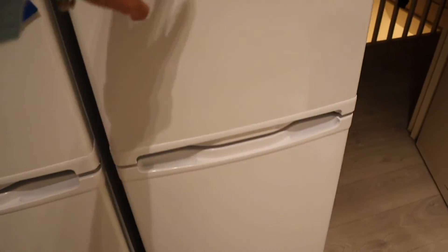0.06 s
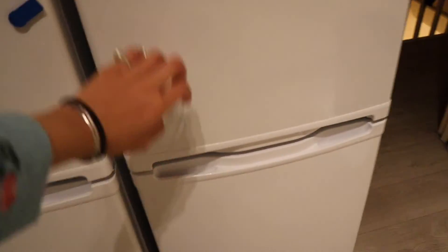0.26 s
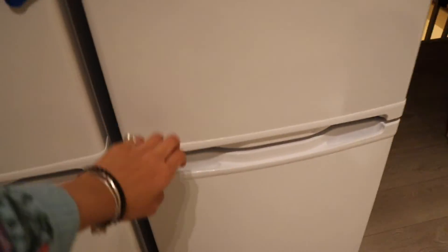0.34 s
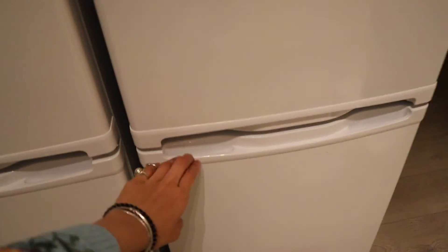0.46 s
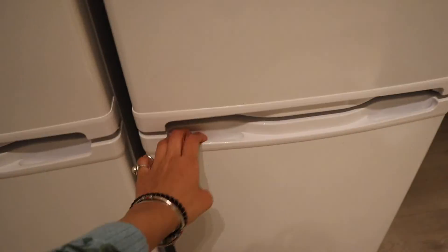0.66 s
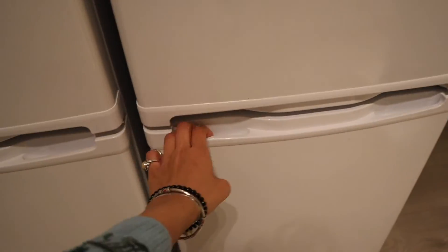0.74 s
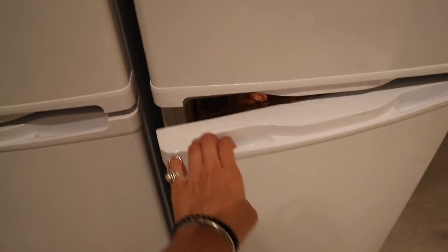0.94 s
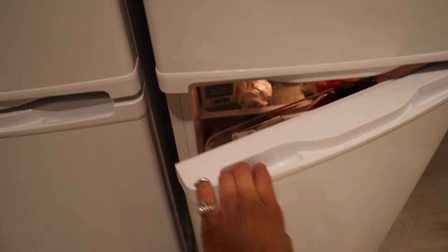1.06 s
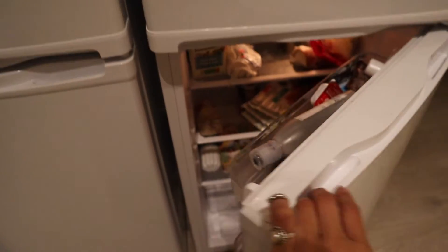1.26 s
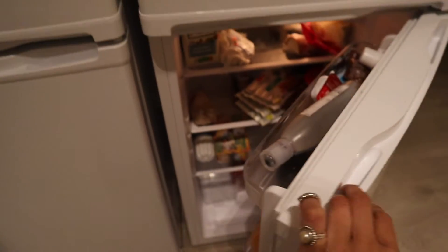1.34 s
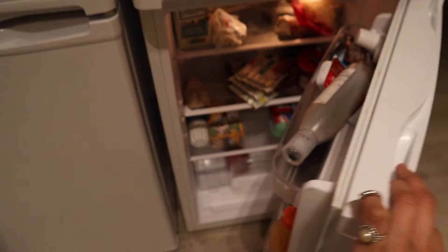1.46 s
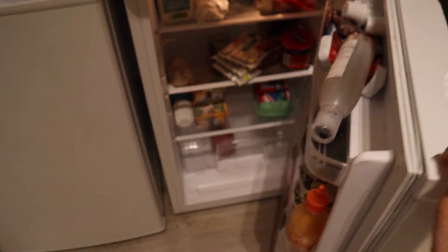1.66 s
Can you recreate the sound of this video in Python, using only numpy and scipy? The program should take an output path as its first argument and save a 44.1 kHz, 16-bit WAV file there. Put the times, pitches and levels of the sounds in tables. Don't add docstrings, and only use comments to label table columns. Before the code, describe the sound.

Close stereo microphone in a small, hard-walled kitchen with faint hum: an overloaded fridge slam, a sharp click of fingers gripping another door, then low clunks and bottle clatter as it swings open.

```python
import sys
import numpy as np
from scipy import signal
from scipy.io import wavfile
from scipy.ndimage import uniform_filter1d

SR = 44100
rng = np.random.default_rng(int(sys.argv[2]) if len(sys.argv) > 2 else 0)


def gain_from_db(level_db):
    decades = np.asarray(level_db, float) / 20
    return 10 ** decades


def unload_audio(sound):
    columns = np.transpose(np.atleast_2d(sound))
    steps = np.round(np.clip(columns, -1, 1) * 32767)
    wavfile.write(sys.argv[1], SR, steps.astype(np.int16))


N = 74970


def evened(x):
    return x / np.sqrt(np.mean(abs(x) ** 2) + 1e-20)


def read(points, hz):
    f, value = np.transpose(points)
    return np.interp(np.log(hz + 1), np.log(f + 1), value)


def colour(x, spectrum):
    hz = abs(np.fft.fftfreq(8192, 1 / SR))
    log_gain = np.log(gain_from_db(np.maximum(read(spectrum, hz), -100)))
    taps = np.fft.ifft(np.exp(np.conj(signal.hilbert(log_gain)))).real[:4096]
    return signal.oaconvolve(x, taps)[:N]


def add(mix, s, sound):
    part = mix[round(s * SR):][:len(sound)]
    part += sound[:len(part)]


def hum():
    # f/Hz, level/dB
    spectrum = [(12, -19), (20, 9.5), (45, 0), (90, -2), (164, 1.5), (223, -10.5), (571, -14.5),
                (1080, -16.5), (2770, -26), (11100, -41), (15000, -42)]
    swell_db = evened(uniform_filter1d(uniform_filter1d(rng.standard_normal(N), 2500), 2500))
    return gain_from_db(-43 + swell_db) * evened(colour(rng.standard_normal(N), spectrum))


def grains(curve, spectrum, per_s, spread_db, smooth):
    s, db = np.transpose(curve)
    chance, size, z = rng.random(N), rng.exponential(1, N), rng.standard_normal(N)
    clicks = z * (chance < per_s / SR) * gain_from_db(spread_db * np.minimum(size, 3))
    x = colour(evened(clicks) + smooth * rng.standard_normal(N), spectrum)
    band = signal.sosfilt(signal.butter(2, [500, 6000], "band", fs=SR, output="sos"), x)
    return x / np.std(band) * gain_from_db(np.interp(np.arange(N) / SR, s, db, -120, -120))


def rubbing():
    # t/s, level/dB
    reach = [(0, -53), (.06, -58), (.13, -51), (.16, -46), (.195, -44.5), (.2, -70)]
    # t/s, level/dB
    slide = [(1.58, -62), (1.64, -50), (1.7, -44.5)]
    # f/Hz, level/dB
    rub = [(120, -42), (200, -6.5), (775, -11.5), (896, -15.5), (2380, -21), (11600, -43.5), (15000, -102)]
    return grains(slide, rub, 2500, 1.6, 0.5) + grains(reach, rub, 2000, 4.8, 0.42)


def touches(rows, width_of, tone):
    rise_s, sag_per_s = .0008, 0.516
    t, out = np.arange(5000) / SR, np.zeros(N)
    noise = rng.standard_normal((len(rows), 2, len(t)))
    for (s, db, hz, t60), z in zip(rows, noise):
        r = np.exp(-np.pi * width_of(hz) / SR)
        fuzz = evened(signal.lfilter([1], [1, -2 * r, r * r], z[0] + 1j * z[1]))
        spin = np.exp(2j * np.pi * hz * (t - sag_per_s * t * t / 2))
        chime = ((tone + fuzz) * spin).real / (1 + tone)
        add(out, s, gain_from_db(db - 60 * t / t60) * np.minimum(t / rise_s, 1) * chime)
    return out


def dull_touches():
    # t/s, peak level/dB, centre f/Hz, time to die by 60 dB/s
    taps = [(.002, -36.5, 1110, 0.067), (.044, -41, 1570, 0.087), (.118, -48.5, 8260, 0.054),
            (.157, -32, 2530, 0.05), (.578, -32, 1670, 0.0097), (.614, -50, 4900, 0.01),
            (.705, -36.5, 3555, 0.24), (.819, -30, 4100, 0.011), (.843, -30.5, 3030, 0.015),
            (.884, -29, 2200, 0.08), (.82, -30, 2780, 0.017), (.6145, -38, 740, 0.042),
            (1.09, -18, 1480, 0.032), (.892, -44, 4260, 0.013), (.927, -19.5, 6100, 0.0091),
            (.927, -22, 2356, 0.12), (1.042, -29, 9000, 0.1), (1.044, -25, 2933, 0.29),
            (1.154, -21.5, 2200, 0.05), (1.464, -30, 1450, 0.024), (1.589, -33, 3280, 0.015),
            (1.632, -42.5, 4100, 0.016)]
    return touches(taps, lambda hz: hz * 0.98, 0)


def chimes():
    # t/s, peak level/dB, pitch f/Hz, time to die by 60 dB/s
    ticks = [(.1985, -7, 1798, 0.033), (.2002, -3, 1940, 0.0074), (.293, -11, 2050, 0.032),
             (.6145, -5.5, 1310, 0.056), (.6142, -14, 2280, 0.014), (.6145, -17.5, 2740, 0.022),
             (.6142, -19, 3990, 0.012), (.6142, -32, 4800, 0.019), (0.624, -23, 1377, 0.085),
             (0.647, -22, 2660, 0.043), (.661, -19, 2707, 0.05), (.66, -26, 1450, 0.047),
             (.668, -31, 1400, 0.034), (.679, -21, 1230, .03), (.675, -29, 2680, 0.046),
             (.693, -29, 2580, 0.043), (.703, -23, 2480, .03), (.711, -17, 2330, 0.023),
             (0.737, -25, 2340, 0.02), (.738, -27.5, 4450, 0.017), (0.754, -24, 2420, 0.058),
             (.754, -32, 4700, 0.03), (.782, -58, 1320, 0.043), (.945, -17, 1170, .06),
             (.984, -16, 1873, 0.046), (.984, -25, 2515, 0.14), (.984, -14, 1400, 0.079),
             (.985, -13, 994, 0.082), (1.001, -20, 1322, 0.11), (1.042, -21, 2200, 0.046),
             (1.09, -6, 702, 0.029), (1.091, -14, 456, 0.11)]
    return touches(ticks, lambda hz: 170, .8)


def ringing(modes, flip=1):
    waver, waver_s, panel_hz = 0.79, .02, 140
    t = np.arange(SR // 2) / SR
    z = rng.standard_normal((len(modes), 2, len(t)))
    z = uniform_filter1d(z, max(int(waver_s * SR), 2), axis=2)
    z = 1 + waver * np.minimum(t / waver_s, 1) * evened(z[:, 0] + 1j * z[:, 1])
    out = np.zeros(len(t))
    for k, (hz, db, t60) in enumerate(modes):
        start = flip ** k * np.sign(hz - panel_hz)
        out += start * gain_from_db(db - 60 * t / t60) * (z[k] * np.exp(2j * np.pi * hz * t)).imag
    return out


def blows(rows, modes, crack_hz, flip=1):
    crack_t60_s = 0.017
    t, push, out = np.arange(2000) / SR, np.zeros(N), np.zeros(N)
    r = np.exp(-2 * np.pi * crack_hz / SR)
    noise = signal.lfilter([1], [1, -2 * r, r * r], rng.standard_normal((len(rows), len(t))))
    for (s, body_db, crack_db, ms), z in zip(rows, noise):
        u = np.arange(0, 1, 1000 / SR / max(ms, .1))
        add(push, s, gain_from_db(body_db) * np.sin(np.pi * u) / len(u))
        add(out, s, gain_from_db(crack_db - 60 * t / crack_t60_s) * evened(z) / 2)
    return out + signal.fftconvolve(push, ringing(modes, flip))[:N]


def slam():
    # t/s, body level/dB, crack level/dB, contact time/ms
    slams = [
        (.2018, -1.5, -3, 1.89),
        (.2040, -18.5, 3.5, 0.72),
        (.227, -30, -34, 0.68),
        (.266, -17, -17, 2.15),
        (.293, -24.5, -9.5, 0.43),
        (.613, -37, -25, 2.8),
    ]
    # f/Hz, level/dB, time to die by 60 dB/s
    cabinet = [(61, -7.5, 0.42), (113, -7, 0.3), (195, 2.5, 0.02), (252, -4, 0.13), (287.5, -15, 0.19),
               (437, -0.5, 0.17), (620, -22, 0.2), (700, 0.5, 0.17), (902, -1.5, 0.29), (1006, 6, 0.21),
               (1434, 13.5, 0.076), (2000, 12.5, 0.016), (2010, 0, 0.032)]
    return blows(slams, cabinet, 5300)


def shudder():
    # t/s, level/dB
    shaking = [(0.2, -15), (0.204, -17.5), (0.22, -22.5), (0.288, -20), (0.404, -33.5), (0.56, -65)]
    # f/Hz, level/dB
    rattle = [(35, -49), (60, -31), (91, -40), (234, -11), (317, -14), (399, -9), (2010, -20), (11600, -47),
              (15000, -100)]
    return grains(shaking, rattle, 2500, 1.9, 0.9)


def grip():
    # t/s, level/dB
    strength = [(0.61, -84), (0.616, -29.5), (0.64, -35.5), (0.852, -43.5), (0.9, -37)]
    # f/Hz, level/dB
    fingers = [(24, -50), (40, -0.5), (153, -7), (1920, -16), (2450, -18), (5430, -36), (11400, -34.5),
               (15000, -59)]
    return gain_from_db(-3) * grains(strength, fingers, 2200, 3.8, 0.38)


def door():
    # t/s, level/dB, pitch f/Hz, time to die by 60 dB/s
    jolts = [(.615, -27, 65.8, 0.23), (.69, -47, 64, 0.26), (.885, -35, 114, 0.14), (.95, -27, 65, 0.21),
             (.985, -17, 177, 0.049), (1.001, -14.5, 190.5, 0.067), (1.0, -27, 70, .2),
             (1.045, -15, 105.5, 0.15), (1.093, -20, 97.2, 0.54), (1.118, -24, 100, 0.19),
             (1.155, -13.5, 115, 0.19), (1.155, -21.5, 240, 0.073), (1.157, -9.5, 444, 0.069),
             (1.183, -18, 240, 0.19), (1.187, -28, 490, 0.048), (1.25, -28, 110, 0.48),
             (1.3, -25, 110.7, 0.2), (1.42, -35, 65, 0.29)]
    rise_s = 0.0042
    t, out = np.arange(SR // 3) / SR, np.zeros(N)
    for (s, db, hz, t60), z in zip(jolts, rng.standard_normal((len(jolts), len(t)))):
        wobble = evened(uniform_filter1d(uniform_filter1d(z, size=900), size=900))
        level = gain_from_db(db - 60 * t / t60 + 2.8 * wobble) * (1 - np.exp(-t / rise_s))
        add(out, s, level * np.sin(2 * np.pi * hz * t + 0.13 * wobble))
    return out


def groan():
    # f/Hz, level/dB, time to die by 60 dB/s
    handle = [(270, -8, 0.057), (341, 4.5, 0.055), (490, 1, 0.033), (810, -2, 0.027)]
    start_s, length_s, level_db, slips_per_s = .707, .064, -33.5, 170
    t, out = np.arange(0, length_s, 1 / SR), np.zeros(N)
    drift = evened(uniform_filter1d(rng.standard_normal(5000), 200))[:len(t)]
    turns = np.cumsum(slips_per_s * (1 + 0.141 * drift)) / SR
    slips = np.diff(np.floor(turns), prepend=0) * np.sin(np.pi * t / length_s) ** 0.28
    add(out, start_s, gain_from_db(level_db) * signal.fftconvolve(slips, ringing(handle)))
    return out


def bottles():
    # t/s, body level/dB, crack level/dB, contact time/ms
    knocks = [(.80, -54, -70, 3.1), (.895, -37, -57, 4.9), (.945, -27, -34, 0.22), (.9835, -3.5, -12, 0.96),
              (.986, 1.5, -15, 1.9), (.9905, -12.5, -18, 1.6), (1.002, -5.5, -25, 1.98),
              (1.019, -16, -45, 1.3), (1.042, -14, -41, 2.8), (1.091, -31, -39, 0.81),
              (1.1565, -1.5, -47, 1.02), (1.162, -10, -56, 1.52), (1.174, -8.5, -48, 1.2),
              (1.183, -8, -43.5, 2.5), (1.194, -9, -52, 0.96), (1.215, -14.5, -55, 1),
              (1.252, -5.5, -31, 3.77), (1.32, -19, -62, 6.4), (1.42, -32, -53, 1.4)]
    # f/Hz, level/dB, time to die by 60 dB/s
    shelf = [(193, -21, 0.089), (240, -8.5, 0.21), (291, -12, 0.074), (386, 0, 0.025), (456, -5, 0.08),
             (490, -8.5, 0.18), (609, -11, 0.058), (736, -5, 0.05), (880, -15.5, 0.19), (1035, -32, 0.12),
             (1390, -27, 0.062), (1950, -29, .05)]
    return -blows(knocks, shelf, 2200, flip=-1.013)


def swing():
    # t/s, level/dB
    pull = [
        (.9, -38.5),
        (.922, -39),
        (.945, -25),
        (.978, -30),
        (.986, -20.5),
        (1.06, -26.5),
        (1.145, -34),
        (1.162, -20.5),
        (1.38, -59.5),
    ]
    # f/Hz, level/dB
    spectrum = [(35, -52), (60, 3.5), (234, 2.5), (269, -2.5), (727, -2), (2530, -18), (7500, -42),
                (11900, -73), (15000, -112)]
    return gain_from_db(-1.5) * grains(pull, spectrum, 2500, 1.4, 0.95)


def hits():
    return slam() + bottles() + door() + (chimes() + dull_touches()) + groan()


def chatter():
    return shudder() + grip() + swing() + rubbing()


def kitchen(x):
    # f/Hz, time to die by 60 dB/s
    decay = [(60, 0.62), (250, 0.62), (1000, 0.57), (4000, 0.47), (12000, 0.3)]
    taps = np.zeros(SR)
    at = np.arange(160, SR - 20, 20)
    taps[at + rng.integers(0, 20, len(at))] = rng.choice([-1., 1.], len(at))
    hz, t, z = signal.stft(taps, SR, nperseg=512)
    fade = gain_from_db(-60 * t / read(decay, hz)[:, None])
    tail = signal.istft(z * fade, SR, nperseg=512)[1]
    return signal.fftconvolve(x, tail / np.linalg.norm(tail))[:N]


def capsule(near, struck, loose):
    return near * struck + loose + gain_from_db(-13) * kitchen(struck + loose) + hum()


def scene():
    # f/Hz, side minus mid level/dB
    sideways = [(30, -64), (100, -27.5), (380, -11), (950, -4), (2380, 2.5), (8000, 7.5), (11500, 9.5),
                (14000, 6)]
    lean = 0.022
    mid_hits, mid_chatter = hits(), chatter()
    side_hits, side_chatter = hits(), chatter()
    mid = capsule(0.83, mid_hits, mid_chatter)
    side = capsule(0.32, side_hits, side_chatter)
    side = colour(side, sideways) + lean * colour(mid, sideways)
    return np.array([mid + side, mid - side])


def low_pass(x):
    return signal.sosfilt(signal.butter(12, 16310, fs=SR, output="sos"), x)


def record(dry):
    x = signal.sosfilt(signal.butter(2, 43, "high", fs=SR, output="sos"), dry)
    x = np.clip(x, -1, 1)
    x = signal.oaconvolve(x, signal.firwin(255, 16300, fs=SR)[None], "same")
    return low_pass(x)


dry = scene()
out = record(dry)
unload_audio(out)
```